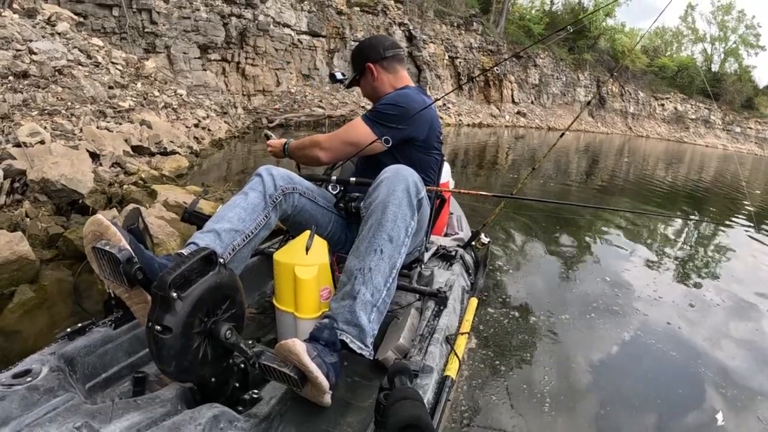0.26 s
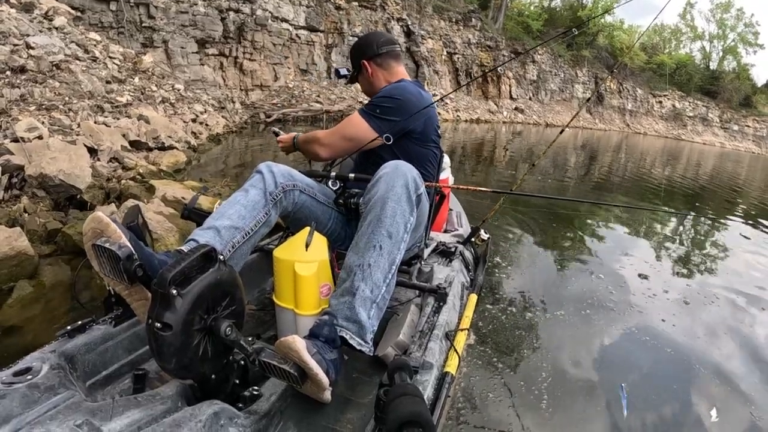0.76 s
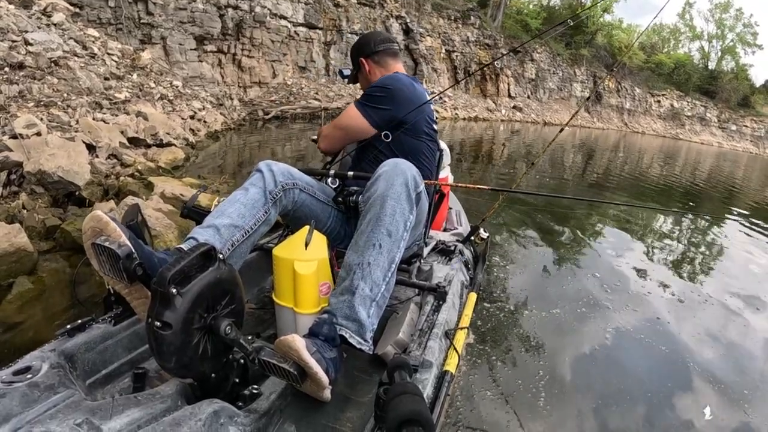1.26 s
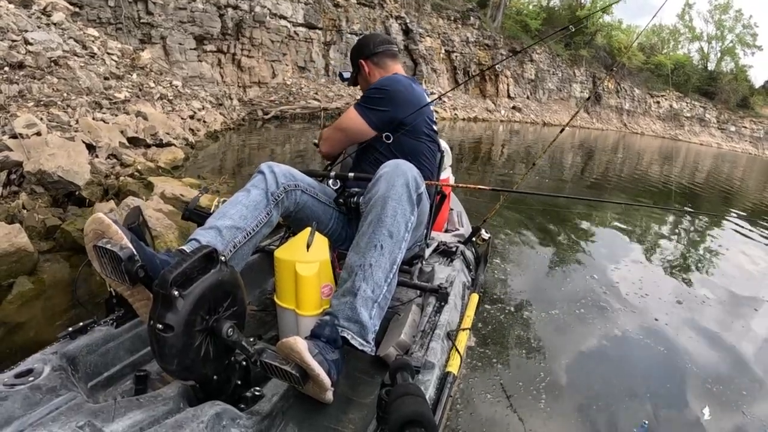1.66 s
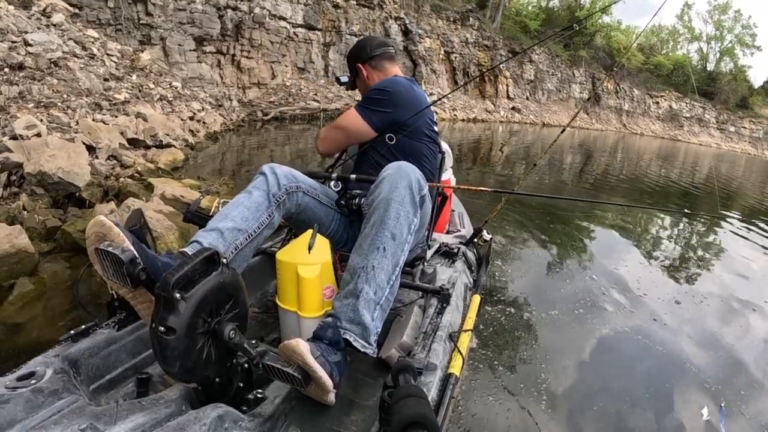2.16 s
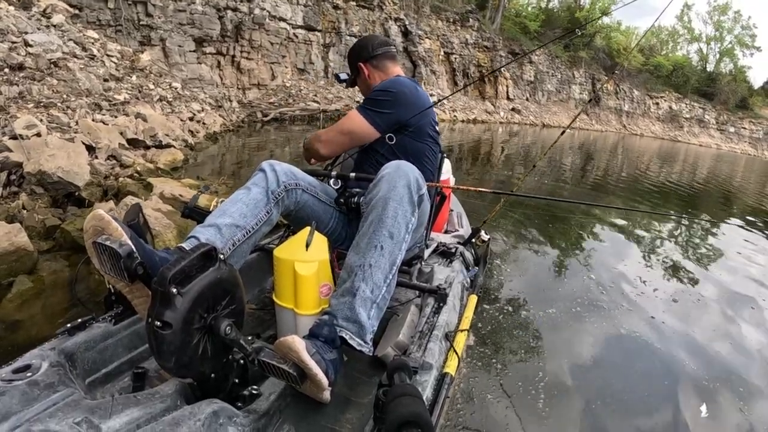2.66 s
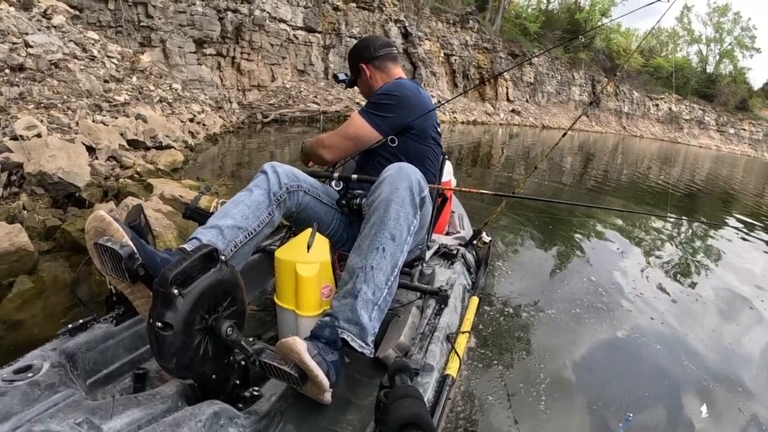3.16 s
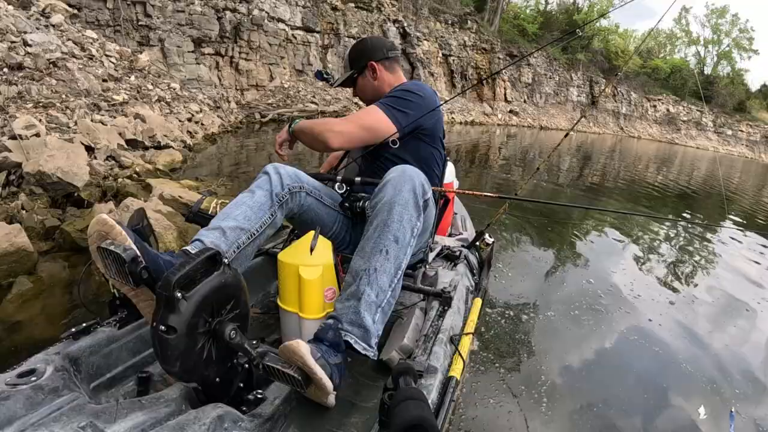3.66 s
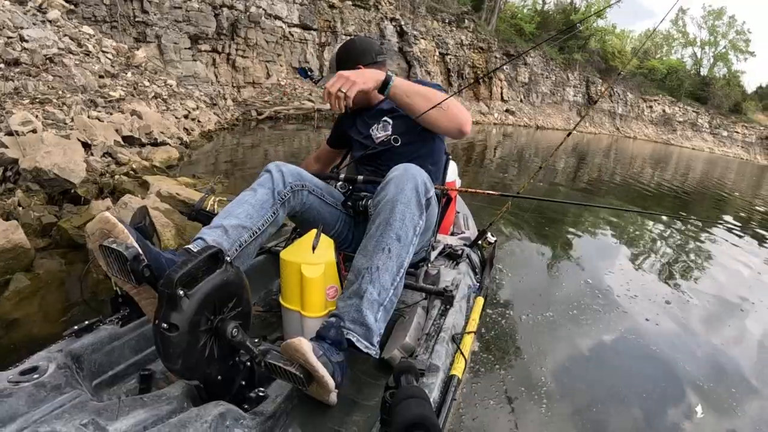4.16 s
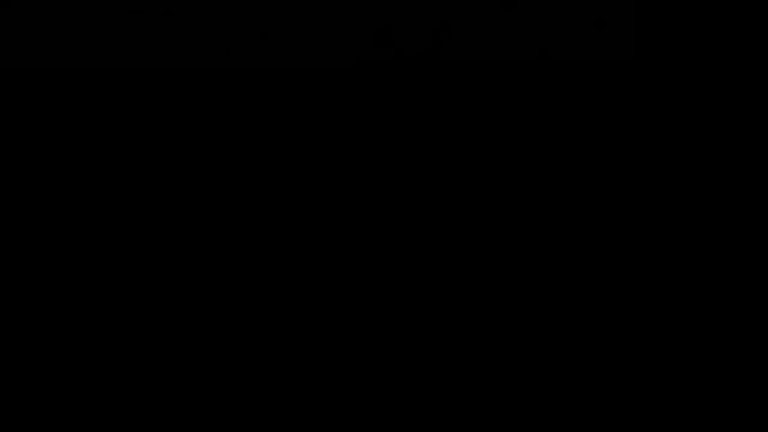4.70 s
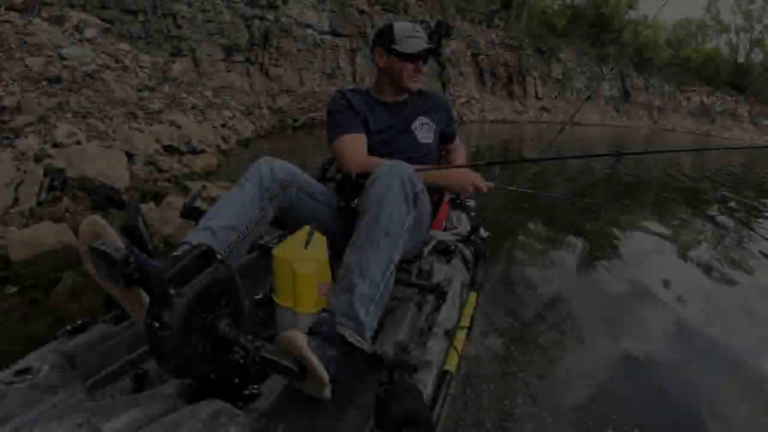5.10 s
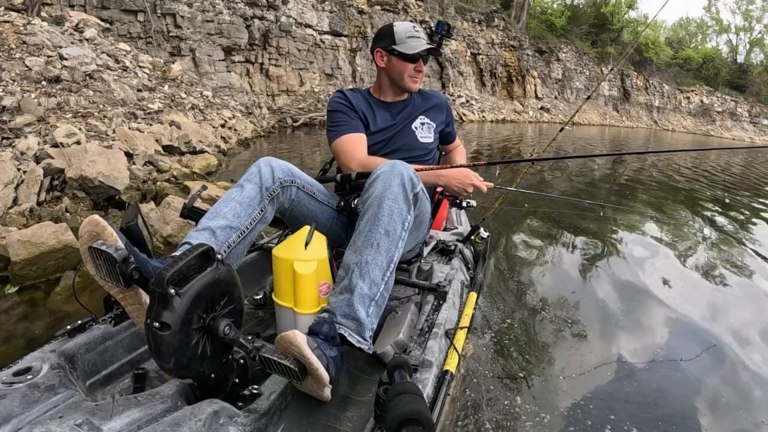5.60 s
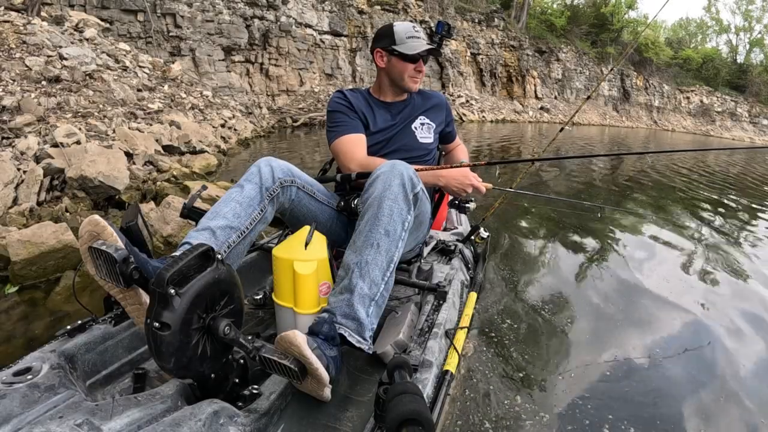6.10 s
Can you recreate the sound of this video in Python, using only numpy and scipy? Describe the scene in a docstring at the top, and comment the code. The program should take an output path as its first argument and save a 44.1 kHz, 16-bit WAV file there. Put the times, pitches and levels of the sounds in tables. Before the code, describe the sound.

Heard through a microphone clamped to a floating plastic kayak: small hard parts tap and scuff, with quiet knocks. After two seconds heavy gear thumps the deck, booming through the hollow hull over deep swaying rumble and faint rustle. Before five seconds the sound cuts abruptly to a quiet stretch with soft low nudges and thin outdoor hiss.

```python
"""Tackle is handled on a hollow plastic kayak afloat; the microphone is clamped to the hull.
At first small parts tap and scuff: short bursts of contacts ring the plastic. From about 2.3 s heavy gear
thumps the deck, and impacts make the hull panels boom while the clamp sways at a very low pitch.
At 4.73 s the sound cuts abruptly to a quieter moment, the boat almost still, with faint taps, a few thumps and
low nudges. Filtered noise makes the rumble and rustle of movement, and a steady outdoor hiss throughout."""
import sys
import numpy as np
from scipy import signal
from scipy.fft import rfft, irfft
from scipy.io import wavfile

SR = 44100
rng = np.random.default_rng(int(sys.argv[2]) if len(sys.argv) > 2 else 0)


def int16_out(signal):
    """Quantize to a 16-bit WAV file."""
    q = np.round(np.clip(np.atleast_2d(signal).T, -1, 1) * 32767)
    wavfile.write(sys.argv[1], SR, q.astype(np.int16))


N = 279594   # length in samples

# heavy gear landing on the deck: t/s, peak level/dB, strongest f/Hz
THUMPS = [(0.44, -30, 153), (0.457, -29, 128.5), (1.413, -42.5, 142), (2.064, -39.5, 184), (2.11, -36, 157),
          (2.269, -28, 56.5), (2.323, -13.5, 150), (2.332, -12.5, 243), (2.409, -25, 262),
          (2.679, -29.5, 161), (2.767, -31, 59.3), (2.803, -12.5, 146), (2.967, -31, 185),
          (3.047, -17, 128.4), (3.291, -15.5, 275), (3.298, -17, 282), (3.307, -14, 120.8),
          (3.377, -9.5, 218.6), (3.409, -19, 110), (3.553, -29, 70.7), (4.054, -15, 157),
          (4.252, -25.5, 100), (4.265, -27, 271), (4.324, -29, 307), (4.359, -34, 120), (4.478, -26, 186),
          (4.628, -35.5, 59.3), (4.695, -35.5, 93), (6.01, -34.5, 61), (6.166, -36.5, 95)]
# hull panels, each ringing at its own pitch: f/Hz, width/Hz, level/dB
HULL_MODES = [(58, 19, -0.5), (77.4, 13, 0), (103.6, 14, -0.5), (150.1, 41.2, 3.5), (158.44, 24.8, 5),
              (191.3, 22, -4.5), (264.4, 70, -5.5), (322.7, 34, -2), (355.4, 34, -6), (460, 24, -14),
              (509.3, 71, -19), (680, 17, -10.5)]
BOUNCE_S, BOUNCE_SHARE = 0.006, 0.35   # time scale and strength of the bounces after a thump
SPOT_WIDTH_SHARE, SPOT_DB = 0.12, 6.0   # the struck panel's own ring: width over pitch, level
TRAVEL_S = 0.005645   # travel time through the hull at 100 Hz


def thumps(focus_db=4.0, scatter_db=4.5, soft_hz=560, rattle_db=-43.5, rattle_s=0.045):
    """A soft impact, a few bounces and a ragged settling shake the panels, most those near the struck pitch."""
    out = np.zeros((2, N))
    t = np.arange(SR // 3) / SR
    hull_hz = np.array(HULL_MODES)[:, 0]
    for s, peak_db, pitch_hz in THUMPS:
        push = from_db(rattle_db) * grit(len(t), spread_db=3.0) * np.exp(-t / rattle_s)
        when = np.r_[0, rng.uniform(.2, 2.5, 6)]   # impact and six bounces, in bounce times
        strength = np.exp(-when) * np.r_[1, BOUNCE_SHARE * rng.uniform(-1, 1, 6)]
        np.add.at(push, (when * BOUNCE_S * SR).astype(int), strength)
        octaves_off = np.log2(hull_hz / pitch_hz)
        colour = -focus_db * octaves_off ** 2 + scatter_db * rng.standard_normal(len(HULL_MODES))
        cut_hz = soft_hz * from_db(0.48 * (peak_db + 18.5))   # a gentle blow is a longer, duller contact
        spot = (pitch_hz, SPOT_WIDTH_SHARE * pitch_hz, SPOT_DB)
        boom = resonate(low_pass(push, cut_hz), HULL_MODES + [spot], [*colour, 0], TRAVEL_S)
        add(out, s - 0.001, boom, peak_db, -.3)
    return out


# hard parts tapping: t/s, peak level/dB, treble level/dB against the peak, strongest f/Hz
TAPS = [(0.04, -50, -2, 1470), (0.57, -39, -16, 1320), (0.599, -36.5, -18, 1420),
        (0.643, -38.5, -15.5, 1700), (0.677, -47, -14, 1250), (0.849, -49.5, -11, 1130),
        (0.88, -42.5, -8.5, 1410), (0.983, -52.5, -32, 1250), (1.074, -43, -22, 1070),
        (1.133, -46, -21, 1110), (1.164, -50, -11, 802), (1.246, -45.5, -8.5, 1990),
        (1.28, -47.5, -8, 1040), (1.352, -38.5, -7, 1980), (1.382, -44, -20, 1200),
        (1.401, -34.5, -7.5, 1640), (1.433, -38.5, -7, 1210), (1.469, -37, -5.5, 920),
        (1.493, -42.5, -3.5, 2220), (1.502, -43.5, 1.5, 1300), (1.85, -42.5, -18, 1070),
        (1.903, -37.5, -18, 1480), (1.953, -42.5, -48, 1080), (1.971, -38, -8, 1980),
        (2.06, -37.5, -6.5, 1770), (2.113, -38.5, -7.5, 1830), (2.325, -22.5, -28, 940),
        (2.673, -33.5, -15, 1130), (2.683, -24.5, -24, 1500), (2.8, -22.5, -20.5, 714),
        (2.894, -38.5, -7.5, 1150), (2.968, -44.5, -66, 1010), (3.031, -41.5, -13, 2330),
        (3.045, -33.5, -16, 1440), (3.133, -44, -5, 1610), (3.187, -43.5, -5.5, 1110),
        (3.292, -19.5, -20, 1010), (3.318, -47, -26.5, 1160), (3.381, -21, -15.5, 1050),
        (3.5, -52, 3, 1030), (3.553, -40.5, -61, 880), (3.598, -42, -50, 1080), (3.627, -51, -45, 1300),
        (3.706, -49, -45, 1200), (3.827, -45.5, -17, 1500), (4.057, -22, -52, 1600),
        (4.479, -35, -54, 1180), (4.629, -35.5, -23, 1540), (4.695, -44.5, -29, 1490),
        (4.709, -46, -28, 1800), (4.977, -75.5, 15, 2000), (5.439, -79, 21, 2000)]
TAP_S = 0.0032   # how fast the burst of a tap dies away


def taps():
    """A hard part knocks briefly: its burst of contacts starts almost at once."""
    rows = [(*tap, TAP_S) for tap in TAPS]
    return contacts(rows, rise_share=0.078, spread_db=4.5, tail_db=-23.5, tail_s=0.031, hull_db=-3.0)


# parts dragged over one another: t/s, peak level/dB, treble level/dB against the peak, strongest f/Hz, length/s
SCUFFS = [(0.101, -53, -18.5, 1300, 0.0072), (0.662, -46, -13, 1250, 0.0075),
          (0.727, -46, -34, 1260, 0.0034), (0.821, -49, -26, 1240, 0.0078), (0.94, -47, -22, 1250, 0.0086),
          (1.23, -48, -44, 720, 0.0089), (1.292, -46.5, -31, 1150, 0.0085), (1.915, -42, -3, 920, 0.0058),
          (2.014, -48.5, -21, 1430, 0.007), (2.253, -38, -11, 1832, 0.018), (2.287, -39, -9, 2210, 0.023),
          (2.314, -53, -34.5, 1080, 0.006), (2.367, -61, 6, 933, 0.0079), (2.386, -25, -12.5, 850, 0.005),
          (2.41, -42.5, -30, 1000, 0.004), (2.605, -40.5, -10, 1060, 0.0041),
          (2.693, -34, 2.5, 2580, 0.0054), (2.762, -27, -15, 2750, 0.0042),
          (3.148, -44.5, -9, 1510, 0.0078), (3.758, -52, -25, 1080, 0.02), (3.992, -48, 0, 1240, 0.0084),
          (4.118, -32, -18.5, 1910, 0.0066), (4.251, -34.5, -15, 3470, 0.0048),
          (4.322, -40.5, -24, 1090, 0.0038), (4.53, -49, -15, 1480, 0.0034),
          (4.618, -41.5, -20, 1430, 0.012), (5.874, -56, -37, 1690, 0.022),
          (5.981, -59.5, -27, 1260, 0.014)]


def scuffs():
    """A dragged part rubs: its contacts swell in more slowly than a tap and are more even in size."""
    return contacts(SCUFFS, rise_share=0.81, spread_db=2.0, tail_db=-35.5, tail_s=0.11, hull_db=1.0)


# plastic tackle and deck, each ringing at its own pitch: f/Hz, width/Hz, level/dB
TACKLE_MODES = [(750, 260, -2), (956.5, 81, 6.5), (1182, 500, 4), (1934, 200, 6), (2048, 272, 3.5),
                (2730, 540, -8), (2550, 274, -14), (3430, 980, -6), (4390, 1400, -3), (4900, 150, 3),
                (5324, 530, -4), (6600, 760, 0), (7280, 460, 0), (8700, 1000, -7.5), (10080, 1300, -14),
                (12100, 2300, -39.5)]
TREBLE_FROM_HZ = 3700   # tackle pitches from here up count as treble
DULLING = 0.2   # dB the body's roll-off pitch drops for each dB of treble lost
RING_WIDTH_SHARE, RING_DB = 0.078, 5   # the part's own ring: width over pitch, level


def split_tackle():
    """The tackle resonances in two groups, body below and treble above."""
    body = [m for m in TACKLE_MODES if m[0] < TREBLE_FROM_HZ]
    top = [m for m in TACKLE_MODES if m[0] >= TREBLE_FROM_HZ]
    return body, top


def contacts(rows, rise_share, spread_db, tail_db, tail_s, hull_db, focus_db=2.5):
    """A burst rings the part and tackle near its pitch; the deck rattles on duller, some reaches the hull."""
    out = np.zeros((2, N))
    t = np.arange(SR // 5) / SR
    body, top = split_tackle()
    body_hz, top_hz = np.array(body)[:, 0], np.array(top)[:, 0]
    for s, peak_db, treble_db, pitch_hz, length in rows:
        grains = grit(len(t), spread_db) * (1 - np.exp(-t / (rise_share * length))) ** 2
        rattle = from_db(tail_db) * np.exp(-t / tail_s) * grains
        dull_rattle = signal.lfilter([.3], [1, -.8], rattle)
        force = grains * np.exp(-t / length) + dull_rattle
        colour = 2 * rng.standard_normal(len(TACKLE_MODES))   # dB, every contact rings a little differently
        pan_db = rng.normal(-.6, 1)

        focus = -focus_db * np.log2(body_hz / pitch_hz) ** 2
        own_ring = (pitch_hz, RING_WIDTH_SHARE * pitch_hz, RING_DB)
        body_sound = resonate(force, body + [own_ring], [*(colour[:len(body)] + focus), 0])
        body_sound = low_pass(body_sound, 7000 * from_db(DULLING * treble_db))
        add(out, s, body_sound, peak_db, pan_db)

        tilt = 0.2 * treble_db * np.log2(top_hz / 6000)   # weak treble also slopes down
        treble_sound = resonate(force, top, colour[-len(top):] + tilt)
        add(out, s, treble_sound, peak_db + treble_db, pan_db)

        hull_sound = low_pass(resonate(force, HULL_MODES, colour, TRAVEL_S), 480)
        hull_peak_db = peak_db + hull_db - 4.1 * np.log2(pitch_hz / 1200)
        add(out, s, hull_sound, hull_peak_db, pan_db)
    return out


# movement aboard, before and after the cut to a quieter moment, levels before the echoes are added:
# t/s, hull rumble level/dB, cloth and line rustle level/dB, rustle treble level/dB
MOVEMENT = [
    [(0.0, -50, -77, -77.5), (0.42, -59, -82.5, -101), (0.52, -37.5, -74, -85), (0.95, -53, -78.5, -92),
     (1.37, -52, -71, -75), (1.74, -58, -83.5, -87), (2.22, -47, -79, -79.5), (2.3, -35.5, -66, -71.5),
     (2.5, -43, -70.5, -71.5), (3.0, -40, -86.5, -79.5), (3.4, -36, -60, -72.5), (3.6, -45.5, -74.5, -81),
     (3.85, -50.5, -66.5, -75.5), (4.14, -36, -62.5, -69), (4.36, -35, -68, -72),
     (4.44, -46.5, -81.5, -80.5), (4.56, -37.5, -65.5, -75.5), (4.73, -38.5, -69, -79)],
    [(4.73, -54.5, -81, -86), (5.99, -65, -86, -91), (6.14, -65, -82, -97), (6.34, -54, -92, -91)],
]


def movement():
    """Shifting weight keeps the hull ringing in lumps; cloth and line rustle through the tackle."""
    s, *columns = np.transpose(MOVEMENT[0] + MOVEMENT[1])
    hull_db, rustle_db, treble_db = [np.interp(np.arange(N) / SR, s, c) for c in columns]
    lumps = rng.standard_normal(N) * from_db(5.1 * drift(10.0))
    hull = resonate(lumps, HULL_MODES, -3.5 * np.log2(np.array(HULL_MODES)[:, 0] / 60))
    rumble = from_db(hull_db) * rms_one(low_pass(hull, 220))
    rub = grit(N, spread_db=4.0) * from_db(3.1 * drift(34) + 1.3 * drift(12.0))
    body, top = split_tackle()
    low = low_pass(resonate(rub, body, np.zeros(len(body))), 3600)
    high = resonate(rub, top, np.zeros(len(top)))
    rustle = from_db(rustle_db) * rms_one(low) + from_db(treble_db) * rms_one(high)
    return (rumble + rustle) * np.ones((2, 1))   # the same on both sides


# lurches of the boat that swing the clamp: t/s of the widest swing, level/dB
LURCHES = [(0.095, -41), (0.782, -38), (1.4, -42), (1.617, -42.5), (2.06, -46), (2.293, -32), (2.499, -31),
           (2.723, -27), (3.0, -30.5), (3.428, -28.5), (3.799, -32.5), (4.06, -24.5), (4.33, -30.5),
           (4.68, -37), (5.08, -44.5), (6.001, -36), (6.16, -40), (6.27, -31.5)]
# low resonances of the clamp: f/Hz, width/Hz, level/dB
CLAMP_MODES = [(29.6, 18, -3), (36.2, 25, -3.5), (20.64, 8.9, -4.5)]
SWAY_RISE_DB_PER_S, SWAY_FALL_DB_PER_S, SWAY_REST_DB = 185.5, 61, -57.5


def sway():
    """Each lurch swings the clamp up quickly on its own low resonances; the swing dies more slowly."""
    s, db = np.transpose(LURCHES)[:, :, None]
    since = np.arange(N) / SR - s
    swells_db = db + np.where(since < 0, SWAY_RISE_DB_PER_S, -SWAY_FALL_DB_PER_S) * since
    level_db = np.maximum(swells_db.max(axis=0), SWAY_REST_DB)
    flat = np.zeros(len(CLAMP_MODES))
    swing = resonate(resonate(rng.standard_normal(N), CLAMP_MODES, flat), CLAMP_MODES, flat)
    swing = swing / (np.abs(signal.hilbert(swing)) + 1.8 * swing.std())   # the widest swings are damped
    return from_db(level_db) * rms_one(swing) * from_db([[-1.6], [1.6]])   # stronger on the right


# low single bumps as the still boat is nudged: t/s, peak level/dB, left minus right level/dB
NUDGES = [(5.047, -36.5, 10), (5.24, -38, 4), (5.598, -34.5, -5.5), (5.99, -27.5, -7), (6.25, -34, -6)]


def nudges(push_s=0.011):
    """One slow shove sets a heavily damped swing going for a cycle or two."""
    out = np.zeros((2, N))
    t = np.arange(SR // 4) / SR
    shove = t / push_s * np.exp(-t / push_s)
    bump = resonate(shove, [(35.5, 53.0, -5.5), (72.4, 72, -5.0)], [0, 0])
    for s, peak_db, pan_db in NUDGES:
        add(out, s, bump, peak_db, pan_db)
    return out


# colour of the outdoor hiss: f/Hz, relative level per Hz/dB
AIR_SPECTRUM = [(160, -18), (280, 2.5), (712, -6), (1030, -8), (1410, -8.5), (2980, -11), (4090, -14),
                (6970, -12.5), (10900, -28.5), (15000, -37)]
# how alike the hiss is on left and right: f/Hz, likeness (0 to 1)
AIR_LIKENESS = [(300, 0.064), (700, 0.12), (3000, 0.38), (8000, 1), (15000, .3)]
AIR_DB = -74   # overall level


def air():
    """Steady outdoor hiss: noise shaped by pitch, most alike on both sides in the treble."""
    mid, side = rfft(rng.standard_normal((2, N))) * from_db(at_hz(AIR_SPECTRUM))
    alike = np.clip(at_hz(AIR_LIKENESS), 0, 1)
    both = np.sqrt(1 + alike) * mid + np.sqrt(1 - alike) * side * [[1], [-1]]
    return from_db(AIR_DB) * rms_one(irfft(both, N))


def nearby(x, echo_db=-11, t60=0.061):
    """Deck, legs and water send back short scattered echoes, different on each side."""
    t = np.arange(SR // 8) / SR
    tails = rng.standard_normal((2, len(t))) * from_db(-60 * t / t60)
    bass_cut = signal.butter(1, 300, "high", fs=SR, output="sos")   # small surfaces return little bass
    tails = signal.sosfilt(bass_cut, tails)
    tails = from_db(echo_db) * tails / np.sqrt(np.sum(tails ** 2, axis=1, keepdims=True))
    return x + signal.fftconvolve(x, tails, axes=1)[:, :N]


def from_db(db):
    """dB to gain."""
    return 10 ** (np.asarray(db) / 20)


def rms_one(x):
    """Scale to rms 1."""
    return x / np.sqrt(np.mean(x ** 2) + 1e-20)


def drift(rate):
    """Slow random wandering with rms 1, from noise smoothed above the rate (Hz)."""
    r = np.exp(-80 * np.pi * rate / SR)   # one step every 40 samples
    slow = signal.lfilter([1], [1, -2 * r, r * r], rng.standard_normal(N // 40 + 2002))[2000:]
    return np.interp(np.arange(N) / 40, np.arange(len(slow)), rms_one(slow))


def resonate(x, modes, extra_db, lag_s=0):
    """Parallel resonances with alternating signs; bending waves bring low ones later (lag at 100 Hz)."""
    out = 0
    for k, (hz, width, db) in enumerate(modes):
        r = np.exp(-np.pi * width / SR)
        ring = signal.lfilter([1, 0, -1], [1, -2 * r * np.cos(2 * np.pi * hz / SR), r * r], x)
        lag = round(lag_s * SR * np.sqrt(100 / hz))
        ring = np.r_[np.zeros(lag), ring][:len(x)]
        out = out + (-1) ** k * (1 - r * r) / 2 * from_db(db + extra_db[k]) * ring
    return out


def grit(size, spread_db):
    """Uneven contacts: noise whose grains differ widely in size."""
    return rng.standard_normal(size) * from_db(spread_db * np.minimum(rng.exponential(1, size), 5))


def low_pass(x, hz):
    """Fourth-order roll-off."""
    return signal.sosfilt(signal.butter(4, np.clip(hz, 50, 15000), fs=SR, output="sos"), x)


def at_hz(points):
    """A table of (Hz, value) read at every FFT bin, along a logarithmic pitch scale."""
    hz = np.maximum(np.fft.rfftfreq(N, 1 / SR), 1)
    return np.interp(np.log(hz), np.log(np.array(points)[:, 0]), np.array(points)[:, 1])


def add(out, s, sound, peak_db, pan_db):
    """Lay one sound in at its time, peak and side (pan is left minus right)."""
    at = round(s * SR)
    sound = sound[:N - at] * from_db(peak_db) / np.abs(sound).max()
    out[:, at:at + len(sound)] += sound * from_db([[pan_db / 2], [-pan_db / 2]])


CUT_S = 4.729   # when the sound cuts to the quieter moment


def scene():
    """All blows, with the earlier ones and their echoes cut off abruptly, then movement, sway, nudges and hiss."""
    small_parts = taps() + scuffs()
    blows = nearby(thumps() + small_parts)
    t = np.arange(N) / SR
    blows = blows * ((t < CUT_S) | (t > CUT_S + .2))   # no earlier blow rings on past the cut
    return blows + nearby(movement(), echo_db=1.5) + sway() + nudges() + air()


# phase between the two microphone ports: f/Hz, lead of the left (radians)
PORT_PHASE = [(60, 0), (780, -.4), (3100, -.7), (4820, -.3), (7000, 0)]
CUTOFF_HZ = 15700


def record(dry):
    """The two ports differ in phase through the middle range; the top is cut."""
    ports = irfft(rfft(dry) * np.exp(.5j * at_hz(PORT_PHASE) * [[1], [-1]]), N)
    return signal.sosfilt(signal.cheby2(12, 70, CUTOFF_HZ, fs=SR, output="sos"), ports)


dry = scene()
out = record(dry)
int16_out(out)
```